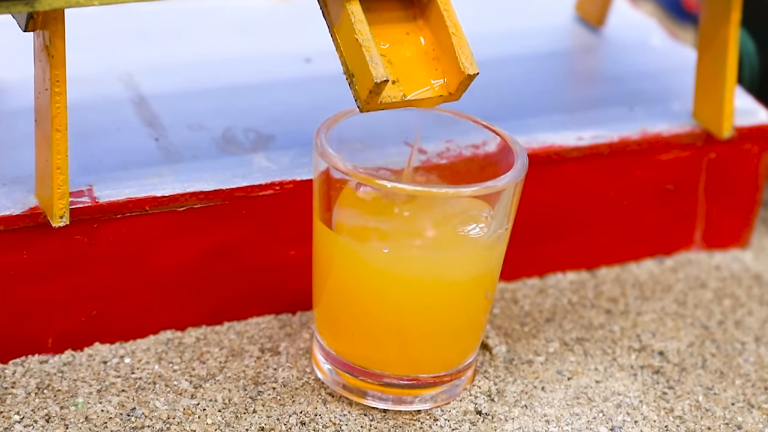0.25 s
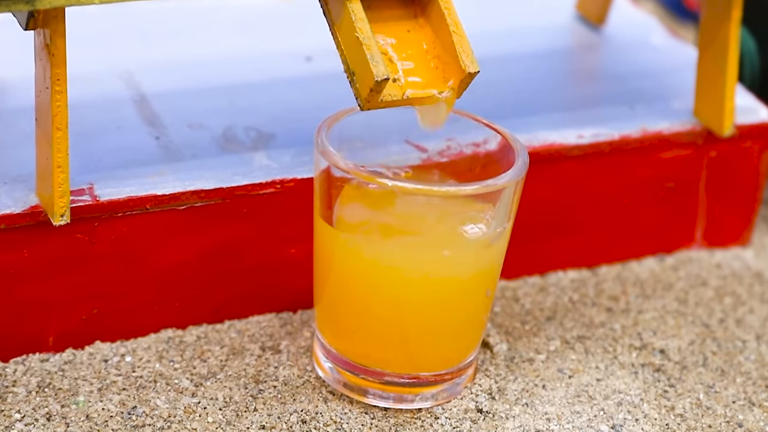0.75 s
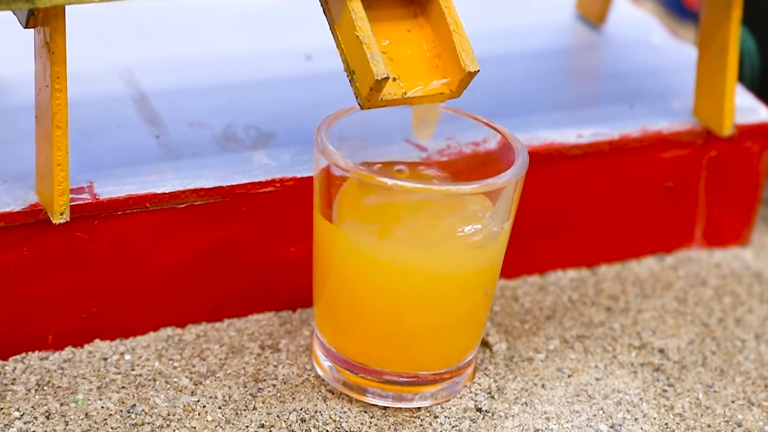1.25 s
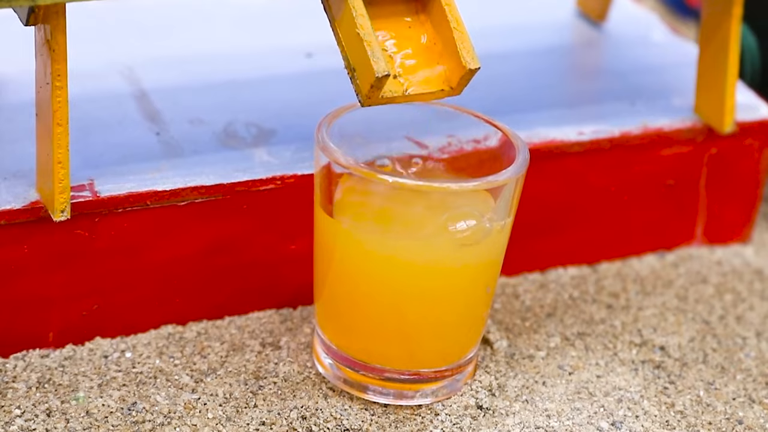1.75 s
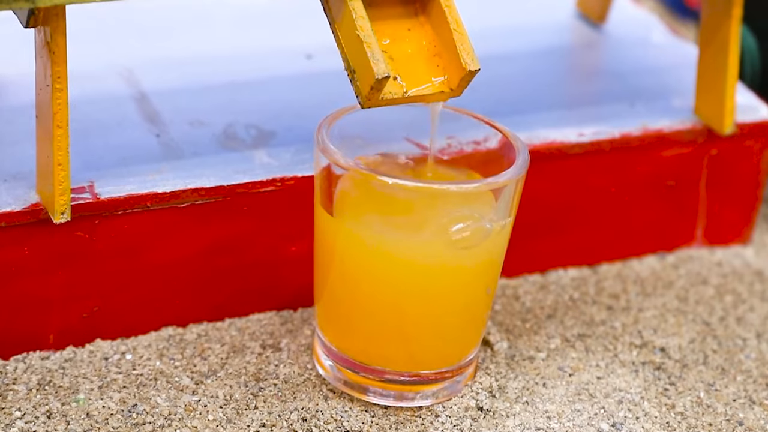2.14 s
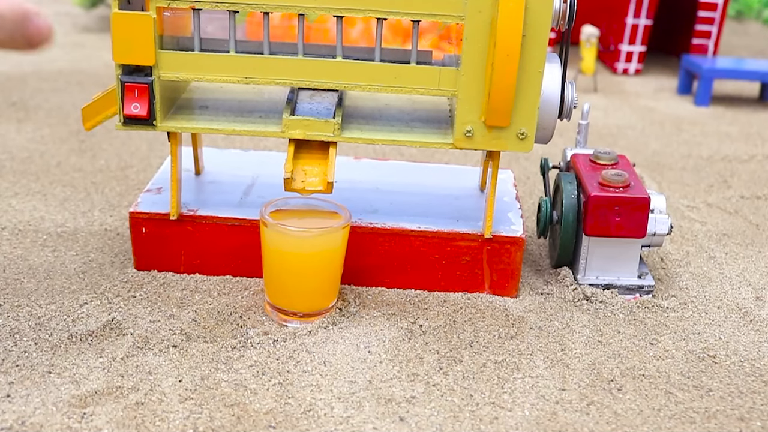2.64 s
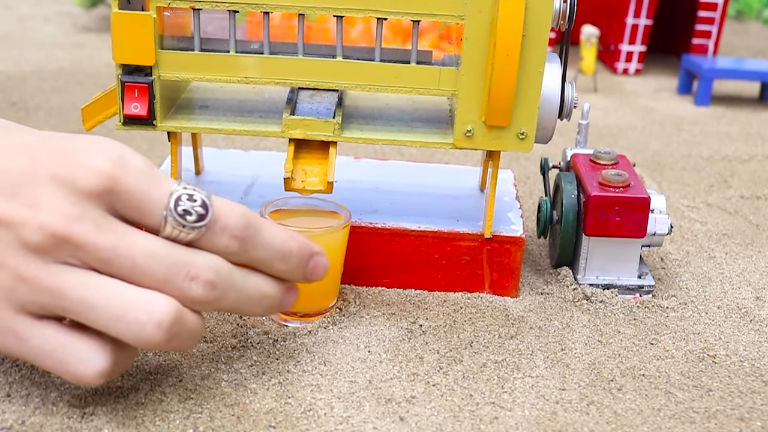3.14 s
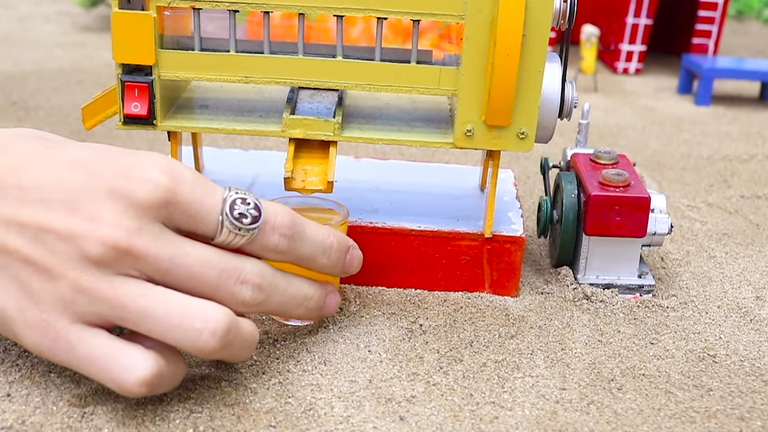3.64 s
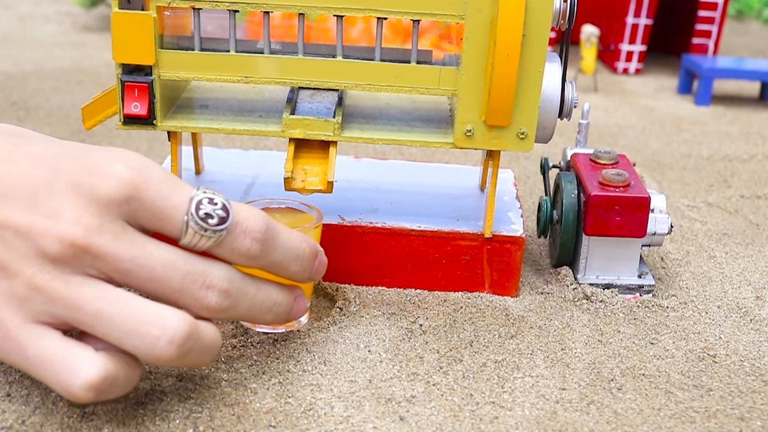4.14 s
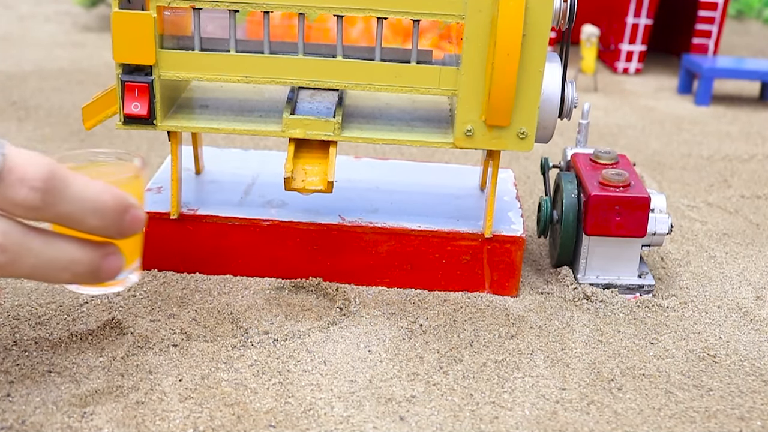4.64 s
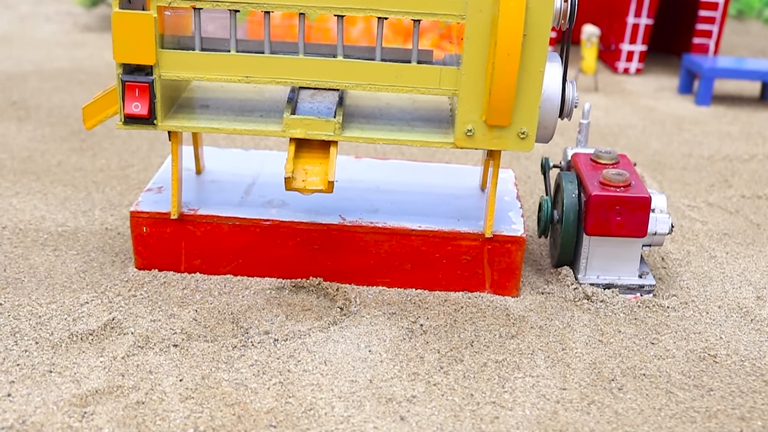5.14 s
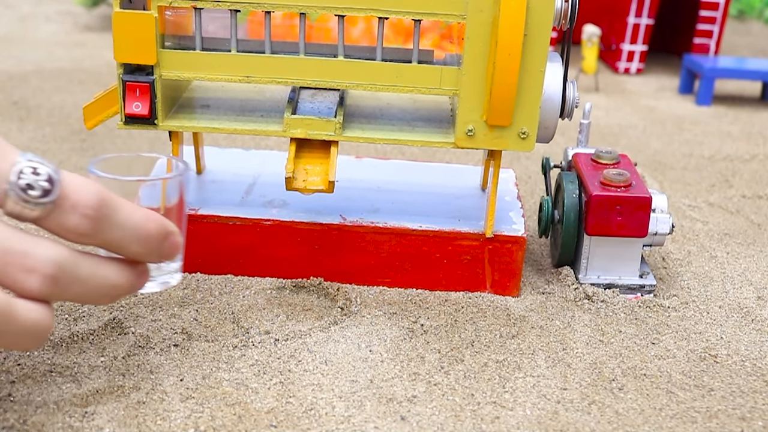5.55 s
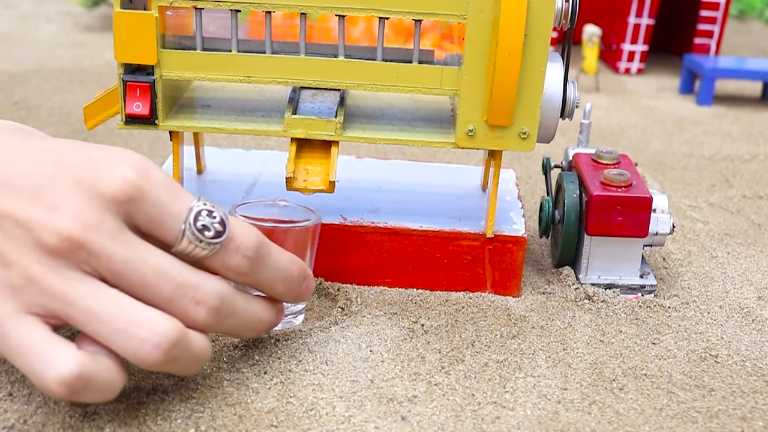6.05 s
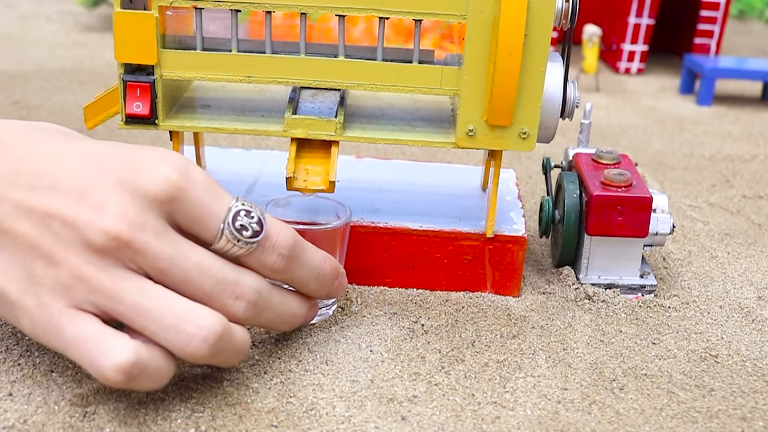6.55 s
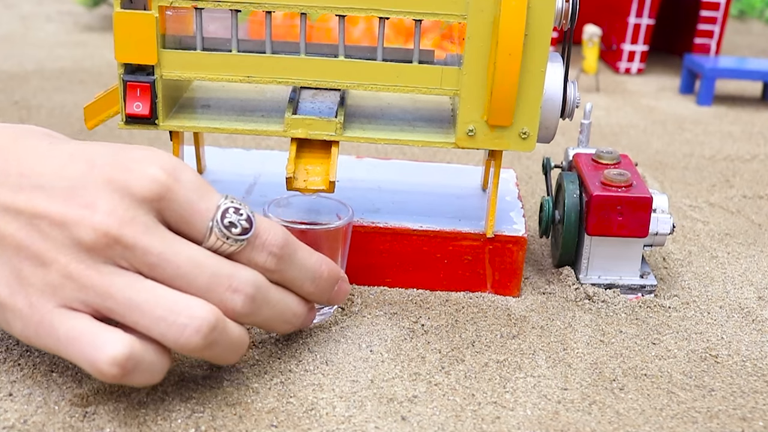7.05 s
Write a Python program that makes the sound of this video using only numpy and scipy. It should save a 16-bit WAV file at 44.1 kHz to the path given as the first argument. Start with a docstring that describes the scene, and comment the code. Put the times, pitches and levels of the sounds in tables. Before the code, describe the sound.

Whining toy press and wet juice patter die away, leaving garden birdsong over faint traffic, one hard glass knock and scrape, later a second clunk.

```python
"""Toy juice press in a garden

A small motor hums, whines and rattles its gears, is switched off and runs down. Splats of juice and
clunks of the gears are noise bursts and short pitched pops, amid fine spray and small bubbles.
Birds sing as gliding tones with a dense echo tail over a far traffic rumble of filtered noise. A full
glass is scraped up from the stand and an empty one knocked down in its place: knocks and rubbing grit
excite the decaying modes of stand and glass."""
import sys
import numpy as np
from scipy import signal
from scipy.fft import rfft, irfft
from scipy.io import wavfile
from scipy.ndimage import uniform_filter1d

SR = 44100
rng = np.random.default_rng(int(sys.argv[2]) if len(sys.argv) > 2 else 0)


def convert_level_to_amplitude(level_db):
    """Map a level in decibels to its linear amplitude factor."""
    exponent = np.asarray(level_db, float) / 20
    return 10 ** exponent


def to_wav(s):
    """Save 16-bit WAV."""
    ch = np.atleast_2d(s).T  # columns
    pcm = np.round(np.clip(ch, -1, 1) * 32767)  # PCM
    wavfile.write(sys.argv[1], SR, pcm.astype(np.int16))


N = 321930  # samples


def evened(x):
    """Power normalisation: scales to an rms of 1."""
    return x / np.sqrt(np.mean(x ** 2) + 1e-20)


def read(points, hz):
    """Interpolation on a logarithmic frequency axis of a table of (Hz, value)."""
    f, value = np.transpose(points)
    return np.interp(np.log(hz + 1), np.log(f + 1), value)


def add(mix, s, sound):
    """Superposition: adds sound to the mix from s seconds on."""
    part = mix[round(s * SR):][:len(sound)]
    part += sound[:len(part)]


def columns(rows):
    """Linear interpolation: start time, then each column of a curve at the sample rate."""
    s, *rest = np.transpose(rows)
    t = np.arange(s[0], s[-1], 1 / SR)
    return s[0], *(np.interp(t, s, c) for c in rest)


def coloured(x, spectrum):
    """Minimum-phase filtering: the log gain fixes the phase, so the response is causal; unit energy."""
    gain_db = read(spectrum, abs(np.fft.fftfreq(4096, 1 / SR)))
    log_gain = np.log(convert_level_to_amplitude(np.maximum(gain_db, -100)))
    taps = np.fft.ifft(np.exp(np.conj(signal.hilbert(log_gain)))).real[:2048]
    return signal.oaconvolve(x, taps / np.linalg.norm(taps))[:len(x)]


def resonate(x, hz, width):
    """Resonance by heterodyning: shift hz (a number or curve) to zero, low-pass, and shift back."""
    turn = np.exp(2j * np.pi * np.cumsum(hz * np.ones(len(x))) / SR)
    r = np.exp(-np.pi * width / SR)
    return 2 * (turn * signal.lfilter([1 - r], [1, -r], x / turn)).real


def ring(modes):
    """Modal superposition: a struck object answers with exponentially decaying sines."""
    t = np.arange(SR // 2) / SR
    return sum(convert_level_to_amplitude(db - 60 * t / t60) * np.sin(2 * np.pi * hz * t) for hz, db, t60 in modes)


def grit(count, per_s, spread_db):
    """Random impulse process: clicks of either sign, a few of them large, at an rms of 1."""
    draw = rng.random((count, 3))
    size = convert_level_to_amplitude(-spread_db * np.log(draw[:, 0] + 0.0041)) * np.sign(draw[:, 1] - .5)
    return evened(size * (draw[:, 2] < per_s / SR))


def glide(length, first, last):
    """Linear glide over length seconds."""
    return np.linspace(first, last, num=round(length * SR))


def whistle(hz, db, rough):
    """Frequency modulation: a slightly hoarse tone follows the pitch curve, with a faint octave."""
    rounded_hz = uniform_filter1d(hz, 150, mode="nearest")  # rounds the corners of the glide
    phase = 2 * np.pi * np.cumsum(rounded_hz) / SR
    hoarse = 1 + rough * evened(uniform_filter1d(rng.standard_normal(len(hz)), 60))
    tone = np.sin(phase) + convert_level_to_amplitude(-48.0) * np.sin(2 * phase)
    return np.sqrt(2) * convert_level_to_amplitude(db) * hoarse * tone * signal.windows.tukey(len(hz), .18)


# Spectrum of the background. Each row: frequency in Hz, relative level in dB per Hz.
AIR = [(12, -33), (20, -6), (81, -4), (337, -18), (422, -25), (897, -27.5), (1440, -34), (1610, -36.5),
       (1910, -38.5), (3530, -40), (5380, -54.5), (7520, -51.5), (8180, -50.5), (9670, -78.5),
       (16000, -80.5)]
# Likeness of left and right. Each row: frequency in Hz, correlation from -1 to 1.
SAME = [(25, 0.96), (60, 1), (130, 0.95), (290, 0.82), (640, 0.34), (1410, -0.5), (3100, -0.83),
        (6820, -0.36), (15000, 0.08)]
# Hump of far engines. The row: frequency in Hz, width in Hz, boost in dB.
RUMBLE = (59.5, 10.2, 9.36)
AIR_DB = -40.5  # rms level


def air():
    """Partially coherent noise fields: far traffic rumble and the hush of the garden."""
    frames, hz = N // 512 + 5, np.fft.rfftfreq(2048, 1 / SR)
    a, b, c, d, patches = np.moveaxis(rng.standard_normal((frames, 1025, 5)), (2, 1), (0, 1))
    patches = evened(uniform_filter1d(uniform_filter1d(patches, 20, 0), 12, 1))
    same = np.clip(read(SAME, hz), -1, 1)[:, None]
    left = a + 1j * b
    right = same * left + np.sqrt(1 - same ** 2) * (c + 1j * d)
    hump_hz, width, hump_db = RUMBLE
    colour_db = read(AIR, hz) + hump_db * np.exp(-((hz - hump_hz) / width) ** 2)
    z = np.array([left, right]) * convert_level_to_amplitude(colour_db[:, None] + 1.2 * patches)
    return convert_level_to_amplitude(AIR_DB) * evened(signal.istft(z, nperseg=2048, noverlap=1536)[1][:, :N])


# Reverberation of the garden. Each row: frequency in Hz, time to decay by 60 dB in seconds.
GARDEN_T60 = [(1000, 1.1), (4000, 1.15), (9000, 1.04)]


def garden(x):
    """Diffuse reverberation: strong early echoes, then scatter, dying at much the same rate at all pitches."""
    t = np.arange(2 * SR) / SR
    taps = rng.standard_normal((3, 2 * SR)) * (t > .004) * (1 + 4.2 * np.exp(-t / 0.012))
    sides = taps[0] + 1.7 * taps[1:]  # a shared part and one of each side's own
    hz, t, z = signal.stft(sides, SR, nperseg=256)
    decay = convert_level_to_amplitude(-60 * t / read(GARDEN_T60, hz)[:, None])
    tail = signal.istft(z * decay, SR, nperseg=256)[1]
    return signal.fftconvolve(x[None], tail / np.linalg.norm(tail[0]), axes=1)[:, :N]


# Warbling phrases, and a faint low tone, perhaps the glass ringing.
# Each row: level in dB, pitch curve as pairs of time in seconds and frequency in Hz.
WARBLES = [(-52.5, [(2.095, 3640), (2.14, 2900), (2.17, 3080), (2.2, 3450), (2.22, 3230)]),
           (-49.5, [(1.155, 2960), (1.18, 2670), (1.22, 2580)]), (-49, [(1.235, 2950), (1.26, 3320),
           (1.275, 3350)]), (-47, [(1.475, 2960), (1.5, 2670), (1.54, 2570)]), (-48, [(1.555, 2940),
           (1.58, 3300), (1.595, 3350)]), (-47, [(1.795, 2930), (1.82, 2670), (1.86, 2590)]),
           (-47.5, [(1.875, 2980), (1.9, 3300), (1.915, 3370)]), (-49, [(2.015, 4290), (2.03, 3730),
           (2.045, 3620)]), (-52, [(2.255, 4050), (2.28, 4820)]), (-54.5, [(2.2, 2850), (2.225, 3300),
           (2.24, 3300)]), (-54, [(2.54, 2900), (2.565, 3310)]), (-54.5, [(2.275, 3540), (2.295, 3690)]),
           (-50, [(2.12, 2980), (2.14, 2700), (2.17, 2580)]), (-47, [(2.385, 4150), (2.4, 3750),
           (2.46, 3200), (2.53, 4020)]), (-50, [(2.455, 2780), (2.48, 2617), (2.52, 2583)]),
           (-49, [(2.705, 3150), (2.755, 3117), (2.795, 3200), (2.805, 2950)]), (-47.5, [(2.795, 2910),
           (2.812, 2550), (2.83, 2690)]), (-48.5, [(2.9, 3000), (2.93, 3100), (2.95, 3540), (2.97, 3260),
           (2.99, 3190)]), (-50, [(3.03, 3380), (3.07, 2700)]), (-52, [(3.13, 2560), (3.142, 2700),
           (3.155, 2770)]), (-53, [(3.18, 2750), (3.19, 3096), (3.2, 2780), (3.21, 3220), (3.22, 2910),
           (3.24, 2990)]), (-48.5, [(3.28, 3500), (3.29, 3245), (3.32, 3225), (3.34, 2850), (3.37, 3550),
           (3.39, 3300)]), (-51, [(3.43, 4620), (3.445, 5600), (3.46, 4320), (3.49, 3600)]),
           (-53, [(3.55, 2734), (3.575, 3000), (3.6, 2730), (3.62, 3130), (3.64, 2720), (3.66, 3150),
           (3.675, 3000)]), (-54, [(3.835, 3220), (3.85, 3860), (3.86, 3000), (3.875, 3810)]),
           (-50, [(3.87, 4330), (3.91, 5050), (3.92, 6030), (3.96, 6230)]), (-47.5, [(4.72, 4200),
           (4.75, 4380), (4.78, 5000), (4.81, 5440), (4.84, 7150), (4.88, 7900)]), (-60.5, [(3.752, 5400),
           (3.767, 7400)]), (-47.5, [(5.705, 3975), (5.725, 3875), (5.745, 3680)]), (-64, [(6.24, 3420),
           (6.35, 3220)]), (-66, [(6.25, 4180), (6.33, 4060)]), (-67, [(6.35, 2950), (6.385, 2580)]),
           (-64, [(6.635, 3090), (6.67, 3190)]), (-65, [(6.58, 1390), (6.7, 1430), (6.9, 1400)]),
           (-48.5, [(2.58, 5860), (2.595, 4300), (2.62, 4100), (2.655, 4330)]), (-51, [(2.298, 6000),
           (2.312, 4700), (2.325, 3320)]), (-58.5, [(3.42, 3150), (3.45, 2906), (3.53, 2920)]),
           (-65.5, [(6.59, 3480), (6.64, 2950), (6.7, 2780)]), (-52.5, [(7.16, 2740), (7.185, 2530),
           (7.21, 2660)]), (-54.5, [(7.24, 2740), (7.27, 3300), (7.29, 3100)])]
# Nearly level whistles, short or with a fading echo.
# Each row: start in seconds, length in seconds, frequency in Hz, level in dB.
LEVEL_WHISTLES = [(1.977, 0.25, 3990, -53.5), (1.125, 0.022, 2480, -47), (1.445, .025, 2480, -44),
                  (1.765, 0.024, 2480, -41), (2.66, 0.15, 4080, -56), (2.089, 0.031, 2460, -49),
                  (2.389, 0.057, 2820, -49), (2.416, 0.053, 2450, -48.5), (2.424, 0.2, 3870, -49.5),
                  (2.759, .025, 2450, -49), (2.81, 0.4, 3854, -52), (3.673, 0.024, 4345, -36),
                  (3.76, 0.076, 7540, -54.5), (3.987, 0.07, 4290, -38), (4.308, 0.021, 4330, -35),
                  (4.568, 0.233, 3864, -48.5), (4.572, 0.28, 4180, -51.5), (5.05, 0.27, 5210, -50.5),
                  (5.05, 0.21, 5500, -55), (5.342, 0.15, 7240, -54.5), (6.7, .15, 7350, -68),
                  (2.66, 0.14, 4300, -61), (2.6, 0.21, 2266, -60)]
# Trill of falling sweeps. Each row: start in seconds, length in seconds, first frequency in Hz, level in dB.
FALLS = [(4.08, 0.026, 6860, -46), (4.209, .07, 7730, -46.5), (4.345, 0.049, 7360, -42.5),
         (4.443, 0.053, 7450, -43), (4.541, 0.048, 7500, -42.5), (4.647, 0.058, 7160, -42.5)]
# Sharp downward chips. Each row: start in seconds, first frequency in Hz, level in dB.
CHIPS = [(3.421, 7320, -56), (5.417, 5740, -56)]
# Low falling chups. Each row: start in seconds, level in dB.
CHUPS = [(1.285, -52.5), (1.605, -58), (1.935, -58.5), (2.255, -53), (2.58, -52), (2.94, -54.5)]
# Faint rising tweets. Each row: start in seconds, level in dB.
TWEETS = [(5.721, -60), (5.855, -62), (5.99, -61.5), (6.205, -67.5), (6.335, -66), (6.646, -59.5),
          (6.81, -63.5)]
# for the level whistles; wander (rms) and sag are shares of the pitch
WHISTLE_FADE_DB, WHISTLE_WANDER, WHISTLE_SAG = -18, 0.0033, .015
FALL_HZ_PER_S, FALL_SLOW_HZ_PER_S, TRILL_S = 58000, 27000, 4.3  # slow until TRILL_S
CHIP_S, CHIP_DROP, CHIP_FALL_S = 0.028, 0.31, 0.0074  # drop as a share of the pitch
CHUP_S, CHUP_FIRST_HZ, CHUP_LAST_HZ = 0.03, 2290, 1820
TWEET_S, TWEET_FIRST_HZ, TWEET_LAST_HZ = .017, 3850, 6250


def notes():
    """Pitch contours: start, frequency curve and level of the near birds' tones and the faint low tone."""
    out = [(*columns(pitch), db) for db, pitch in WARBLES]
    for s, length, hz, db in LEVEL_WHISTLES:
        wander = evened(uniform_filter1d(rng.standard_normal(round(length * SR)), 500))
        settled = 1 - np.exp(-glide(length, 0, length) / .03)  # the pitch sags from the start on
        pitch = hz * (1 + WHISTLE_WANDER * wander - WHISTLE_SAG * settled)
        out.append((s, pitch, db + glide(length, 0, WHISTLE_FADE_DB)))
    for s, length, hz, db in FALLS:
        rate = FALL_HZ_PER_S if s > TRILL_S else FALL_SLOW_HZ_PER_S
        onset_db = -9 * np.exp(-glide(length, 0, length) / 0.0053)
        out.append((s, glide(length, hz, hz - rate * length), db + onset_db))
    drop = 1 - CHIP_DROP * (1 - np.exp(-glide(CHIP_S, 0, CHIP_S) / CHIP_FALL_S))
    out += [(s, hz * drop, db) for s, hz, db in CHIPS]
    out += [(s, glide(CHUP_S, CHUP_FIRST_HZ, CHUP_LAST_HZ), db) for s, db in CHUPS]
    return out + [(s, glide(TWEET_S, TWEET_FIRST_HZ, TWEET_LAST_HZ), db) for s, db in TWEETS]


CHATTER_DB, CHATTER_NOTES, CHATTER_ENDS_S = -74.5, 1533, 6.95  # loudest note, count, last start


def chatter():
    """Random superposition: many short gliding notes of far small birds."""
    far = np.zeros(N)
    for when, pitch, bend, length, size in rng.random((CHATTER_NOTES, 5)):
        count = round((0.019 + 0.055 * length) * SR)
        hz = (2500 + 3600 * pitch ** 1.5) * np.geomspace(1, .7 + 0.35 * bend, num=count)
        add(far, when * CHATTER_ENDS_S, whistle(hz, CHATTER_DB - 8 * size, 1.03))
    return far


# Buzzy notes. Each row: start in seconds, length in seconds, frequency in Hz, width in Hz, level in dB.
BUZZES = [(4.191, 0.041, 8100, 700, -55), (4.774, 0.053, 4620, 610, -47), (4.86, 0.028, 7870, 603, -66.5),
          (5.486, 0.18, 8000, 700, -62), (6.666, 0.047, 7730, 1383, -59.5)]
# Side of the singer. Each row: valid until in seconds, lead of the left side in samples.
BIRD_SIDES = [(5., 15), (5.4, -6), (6.9, -17), (7.4, 22)]
GARDEN_DB = -1.2  # reverberation of the near birds against their direct sound


def birds():
    """Interaural time difference places near notes and buzzes; far birds reach us as echoes only."""
    near = np.zeros(N)
    for s, hz, db in notes():
        add(near, s, whistle(hz, db, 0.14))
    for s, length, hz, width, db in BUZZES:
        hiss = resonate(resonate(rng.standard_normal(round(length * SR)), hz, width), hz, width)
        add(near, s, convert_level_to_amplitude(db) * evened(hiss) * signal.windows.tukey(len(hiss), .5))
    until, lead = np.transpose(BIRD_SIDES)
    at = np.arange(N)
    half = lead[np.searchsorted(until * SR, at)] / 2
    sides = np.array([np.interp(at + half, at, near), np.interp(at - half, at, near)])
    return sides + garden(convert_level_to_amplitude(GARDEN_DB) * near + chatter())


# Knocks. Each row: time in seconds, level in dB, loudest tone in Hz, its rise in seconds,
# drive of the glass in dB.
KNOCKS = [(4.0787, -26, 1230, 0.00058, -42), (4.086, -26, 1500, 0.0013, -50),
          (4.091, -24.5, 350, .003, -48), (4.103, -29, 1110, 0.0015, -38), (4.111, -21.5, 484, .002, -40),
          (4.122, -9.5, 470, 0.002, -36), (4.129, -11, 620, 0.002, -36), (4.134, -13.5, 582, .002, -32),
          (4.141, 1, 552, 0.0037, -22), (4.132, -9, 1640, 0.002, -29.5), (4.145, -18, 2560, .002, -33),
          (4.155, -16, 2670, 0.0012, -15), (4.156, -22, 4500, 0.001, -35), (6.444, -4.5, 915, 0.00071, -26),
          (6.4445, -26.5, 5040, .0005, -35.5), (6.4646, -13, 885, 0.0006, -26.5),
          (6.4637, -10, 1530, .0006, -29.5), (6.4688, -18, 4970, .0006, -13),
          (6.471, -17, 531, 0.00064, -33), (6.468, -10, 314, 0.0043, -11), (6.472, -7.5, 1440, 0.001, -32)]
KNOCK_CYCLES = 22  # a knock dies by 60 dB in so many cycles of its tone


def knocks(direct, force, rim):
    """Impact excitation: each knock sounds a short tone and sends a pulse into stand and glass."""
    t = np.arange(SR // 2) / SR
    for s, db, hz, rise, glass_db in KNOCKS:
        tone = ring([(hz, db, KNOCK_CYCLES / hz)])
        add(direct, s, tone * (1 - np.exp(-(t / rise) ** 2)))
        add(force, s, convert_level_to_amplitude(db - 38.0) * np.hanning(9))
        add(rim, s, convert_level_to_amplitude(glass_db) * np.array([.25, .5, .25]))


# A glass bottom rubs the stand as it lifts. Each row: time in seconds, rubbing force in dB.
LIFT = [(4.048, -64), (4.052, -48), (4.075, -49), (4.085, -37), (4.098, -44), (4.115, -32.5), (4.135, -30),
        (4.158, -25), (4.17, -50), (4.185, -48)]
# A glass bottom rubs the stand as it settles. Each row: time in seconds, rubbing force in dB.
SETTLE = [(6.4636, -42.5), (6.465, -14.5), (6.472, -16), (6.478, -23.5), (6.49, -29.5), (6.505, -49)]
# Sound of the grit itself. Each row: frequency in Hz, relative level in dB per Hz.
RUB = [(300, 1.5), (1500, 5.5), (2150, -2), (3000, -1), (5000, -8), (8000, -25), (9000, -58)]
# Its hiss under hard rubbing. Each row: frequency in Hz, relative level in dB per Hz.
RUB_TREBLE = [(5000, -30.5), (8000, 3.5), (13500, -6), (14500, -30)]


def rubbing(direct, force, rim):
    """Friction excitation: grit clicks are heard directly and drive stand and glass."""
    for stroke, per_s in ((LIFT, 1200), (SETTLE, 6000)):
        s, force_db = columns(stroke)
        rub = convert_level_to_amplitude(force_db) * grit(len(force_db), per_s, 2.2)
        add(force, s, convert_level_to_amplitude(-30.5) * rub)
        add(rim, s, convert_level_to_amplitude(-22) * rub)
        add(direct, s, convert_level_to_amplitude(-7.5) * coloured(rub, RUB))
        hiss_db = -20 + 1.5 * (force_db - force_db.max())  # only hard rubbing hisses
        add(direct, s, convert_level_to_amplitude(hiss_db) * coloured(rub, RUB_TREBLE))


# Modes of the full glass. Each row: frequency in Hz, relative level in dB, 60 dB decay time in seconds.
FULL_GLASS = [(1118, -7.5, 0.13), (2560, -6.5, 0.057), (2680, -5, 0.042), (1500, -0.5, 0.016),
              (3000, -14, 0.045), (4480, -8, 0.024), (4880, -19, 0.048), (7370, -14, 0.11),
              (10100, -16.5, 0.086), (11200, -31.5, 0.059), (12500, -23, 0.074), (12980, -28, 0.11)]
# Modes of the full glass clear of the stand. Each row: frequency in Hz, level in dB, 60 dB decay in seconds.
FREE_GLASS = [(1497, -33, 1.3), (2998, -36, .55), (5006, -50, .35)]
# Modes of the empty glass. Each row: frequency in Hz, relative level in dB, 60 dB decay time in seconds.
EMPTY_GLASS = [(1502, -12, 0.12), (1588, -4, 0.09), (2988, -18, 0.15), (3040, -21, 0.13), (5055, -9, 0.074),
               (6541, -30, .07), (7429, -16, 0.055), (7390, -23, 0.16), (9749, -35, .12), (10090, -32, .12),
               (11150, -38, .09), (12690, -32, .1)]
# Modes of the stand. Each row: frequency in Hz, relative level in dB, 60 dB decay time in seconds.
STAND = [(294, -27.5, 0.024), (552, 5.5, 0.059), (787, -1.5, 0.054), (926, -12.5, 0.032), (993, -7, 0.09),
         (1643, 2, 0.056), (2310, -14.5, 0.03), (2480, -1.5, 0.017), (2700, -15.5, 0.061),
         (2070, -10, 0.046), (3870, -8.5, 0.027), (4600, -15.5, .025)]
FREE_S, GRIP_S = 4.156, 4.385  # the full glass comes clear; fingers close on it and stop its ring


def glasses():
    """Modal response: knocks and grit drive the stand and whichever glass touches it."""
    direct, force, rim = np.zeros((3, N))
    knocks(direct, force, rim)
    rubbing(direct, force, rim)
    gripped = np.arange(N) > GRIP_S * SR
    full = signal.oaconvolve(rim * ~gripped, ring(FULL_GLASS))[:N]
    add(full, FREE_S, ring(FREE_GLASS))
    full *= uniform_filter1d(1. - gripped, 60)
    empty = signal.oaconvolve(rim * gripped, ring(EMPTY_GLASS))[:N]
    return direct + full + empty + signal.oaconvolve(force, ring(STAND))[:N]


def pop(hz, cycles, rise):
    """Damped oscillation, as of an air pocket in liquid: a brief decaying tone of rising pitch."""
    u = np.arange(round(4 * cycles / hz * SR)) / SR * hz / cycles  # time in units of the 1/e decay
    return (1 - np.exp(-u / 0.076)) * np.exp(-u) * np.sin(2 * np.pi * cycles * (u + rise * u ** 2))


# Flow of fine spray and small bubbles. Each row: time in seconds, relative level in dB.
TRICKLE = [(0.0, -42.5), (0.47, -45), (0.65, -41), (0.96, -47), (1.15, -47.5), (1.17, -57.5), (1.2, -44),
           (1.27, -39), (1.288, -62), (1.305, -46.5), (1.36, -46.5), (1.39, -49), (1.41, -51), (1.51, -46),
           (1.55, -45.5), (1.6, -51.5), (1.645, -52.5), (1.665, -54), (1.7, -45), (1.79, -50.5),
           (1.87, -49.5), (1.892, -64), (1.905, -41), (1.93, -57), (1.99, -65), (2.06, -74), (2.3, -87)]
# splat and bubble levels are against the trickle, mist against the splat; the spread only lowers them
SMALL_PER_S, SMALL_SPLAT_DB, SMALL_MIST_DB, SMALL_BUBBLE_DB, SMALL_SPREAD_DB = 12, 10, -9, 18.5, 7.5
SMALL_LOW_HZ, SMALL_HIGH_HZ = 600, 9000


def small_drips():
    """Random arrivals: rows of small drips, each with its bubble, whose size follows the trickle."""
    s, db = np.transpose(TRICKLE)
    when, size, pocket, pitch = rng.random((round(SMALL_PER_S * s[-1]), 4)).T
    when = when * s[-1]
    level_db = np.interp(when, s, db) - SMALL_SPREAD_DB * size
    drips = [(w, d + SMALL_SPLAT_DB, SMALL_MIST_DB) for w, d in zip(when, level_db)]
    hz = SMALL_LOW_HZ * (SMALL_HIGH_HZ / SMALL_LOW_HZ) ** pitch
    bubble_db = level_db + SMALL_BUBBLE_DB - SMALL_SPREAD_DB * pocket / 2
    return drips, list(zip(when, bubble_db, hz))


def spray_and_murmur(body, treble, pitched):
    """Clustered random impulses: fine spray ticks in clumps while small bubbles murmur."""
    s, level_db = columns(TRICKLE)
    count, t = len(level_db), np.arange(300) / SR
    level_db = level_db + 4.8 * evened(uniform_filter1d(rng.standard_normal(count), 700))
    puffs = rng.standard_normal((5, 300)) * np.exp(-((t - .003) / 0.0023) ** 2)
    for layer, db in ((body, 1.5), (treble, -3)):
        ticks = sum(signal.oaconvolve(grit(count, 85., 1.0), puff)[:count] for puff in puffs)
        clump_db = 1.7 * evened(uniform_filter1d(rng.standard_normal(count), 1200))  # each layer's own
        spray = 0.32 * rng.standard_normal(count) + evened(ticks)
        add(layer, s, convert_level_to_amplitude(level_db + db + clump_db) * spray)
    level_db = uniform_filter1d(level_db, 4000)  # the murmur goes on through lulls in the spray
    for hz in np.geomspace(450, 12000, num=20):
        murmur = signal.oaconvolve(grit(count, 15.0, 2.3), pop(hz, 3.2, 0.037))[:count]
        pitch_db = read(((450, 3), (2200, 3.0), (5000, -4.0), (12000, -26.5)), hz)
        add(pitched, s, convert_level_to_amplitude(level_db - 12.5 + pitch_db) * evened(murmur))


TINT_LOW_HZ, TINT_HIGH_HZ, TINT_Q, TINT = 1800, 7000, 5.8, 1.73  # each burst favours a band of its own


def noisy_bursts(bursts, body, treble):
    """Impact noise: each row gives a decaying burst with a band of its own and a mist of treble."""
    t = np.arange(900) / SR
    for (s, db, mist_db), noise in zip(bursts, rng.standard_normal((len(bursts), 900))):
        decay = np.exp(-t / 0.0027) + 0.3 * np.exp(-t / 0.01)
        burst = np.tanh(noise) * (1 - np.exp(-t / 0.00051)) * decay
        burst[30:33] += 1.5  # a sharp click just after the start
        tint_hz = TINT_LOW_HZ * (TINT_HIGH_HZ / TINT_LOW_HZ) ** (.5 + np.tanh(noise[-1]) / 2)
        tinted = resonate(burst, tint_hz, tint_hz / TINT_Q)
        add(body, s, convert_level_to_amplitude(db) * (0.26 * burst + TINT * tinted))
        mist_decay = np.exp(-t / 0.0014) + 0.076 * np.exp(-t / 0.0047)
        mist = noise[::-1] * (1 - np.exp(-(t / 0.00099) ** 2)) * mist_decay
        add(treble, s, convert_level_to_amplitude(db + mist_db) * mist)


CYCLES_AT_KHZ, CYCLES_SLOPE = 4.22, 0.33  # higher pops ring for more cycles
POP_RISE = 0.11  # largest factor of the squared term in a pop's phase


def pitched_pops(pops, body, pitched):
    """Damped resonance: each row gives a short fluttering tone that starts with a tick of noise."""
    t = np.arange(200) / SR
    for (s, db, hz), noise in zip(pops, rng.standard_normal((len(pops), 3000))):
        cycles = CYCLES_AT_KHZ * (hz / 1000) ** CYCLES_SLOPE
        tone = pop(hz, cycles, POP_RISE * min(abs(noise[0]), 2) / 2)
        flutter = 1 + 0.34 * evened(uniform_filter1d(noise, round(SR / hz)))[:len(tone)]
        add(pitched, s, convert_level_to_amplitude(db) * tone * flutter)
        add(body, s, convert_level_to_amplitude(db - 10.5) * noise[:200] * np.exp(-t / .0008))


# Noisy bursts: splats of juice and clunks of the gears.
# Each row: time in seconds, burst level in dB, mist against burst in dB.
BURSTS = [(.058, -19, -10), (.0925, -32, -10), (.1595, -20, 3), (.1915, -17, -4), (.226, -21, -14),
          (.247, -16.5, 3), (.2687, -17.5, -3), (.3122, -22.5, 7), (.4603, -22, 2), (.48, -29, -6),
          (.4994, -15.5, -2.5), (.5255, -13, -13), (.7025, -16, -18), (.7213, -21, -3), (.7453, -12.5, 3.5),
          (.7841, -30, -1), (.8185, -25, 4), (.859, -25, 7), (.9009, -30, 11), (.9098, -22.5, 0),
          (1.0062, -32, 11), (1.0218, -26.5, 10), (1.051, -42, 19), (1.065, -14.5, 8), (1.1054, -17.5, -3),
          (1.121, -45, 19), (1.1504, -31.5, 13), (1.1555, -38, 20.5), (1.1925, -30.5, 5),
          (1.2393, -28, -10), (1.2685, -31, -9), (1.3023, -38, -18), (1.3107, -21, 4), (1.3409, -26, 5),
          (1.4112, -23, -20), (1.4436, -28.5, -19), (1.5239, -26, -16), (1.5645, -22.5, 4.5),
          (1.595, -19, -9), (1.622, -9.5, -14), (1.6736, -37, 13), (1.66, -33, -10), (1.761, -39, -10),
          (2.038, -52, 5), (2.064, -46, -8), (1.703, -23, -13), (1.719, -23.5, -3), (1.729, -26, -17),
          (1.7612, -41, 17), (1.8203, -30, 11.5), (1.862, -30, 2), (1.9028, -19, 1.5), (1.936, -26, -3),
          (1.9813, -47, 5), (2.052, -39.5, 15.5), (2.0862, -48, 4), (1.42, -38, 11), (1.353, -34, -7),
          (1.488, -22.5, -4), (1.641, -27, 9.5), (1.683, -26, 6), (2.11, -52, 1), (2.19, -65, 3),
          (2.2408, -54, -8)]
# Short pitched pops of the juice and of the rattling gears.
# Each row: time in seconds, level in dB, frequency in Hz.
POPS = [(0.039, -14.5, 2640), (.105, -15, 715), (.1251, -26, 2100), (0.1338, -10, 1970),
        (0.163, -19.5, 2100), (.209, -18, 597), (0.227, -27, 1940), (0.292, -17, 2650), (.293, -13.5, 777),
        (.478, -20, 796), (0.4837, -20, 2170), (0.525, -17, 1295), (0.526, -20, 2340), (0.561, -11.5, 2480),
        (.5806, -15, 2100), (0.619, -17.5, 815), (0.6584, -12.5, 2100), (0.745, -25, 1506),
        (.764, -16, 790), (0.786, -8.5, 1850), (0.8191, -12.5, 1370), (0.8205, -12.5, 1980),
        (.871, -18, 750), (.958, -19, 736), (0.9666, -15, 1970), (0.9977, -16.5, 2020), (1.0397, -28, 2150),
        (1.064, -26, 380), (1.064, -35, 2200), (1.0871, -32, 2400), (1.1052, -18, 2100),
        (1.194, -14.5, 2140), (1.2137, -12, 2180), (1.238, -18, 1820), (1.25, -26.5, 720),
        (1.268, -17, 4000), (1.3073, -23, 2600), (1.315, -24.5, 756), (1.361, -24, 2430),
        (1.3897, -25, 1700), (1.4093, -13.5, 3410), (1.4528, -20, 2310), (1.487, -24.5, 1270),
        (1.492, -22, 1800), (1.5091, -18, 2240), (1.522, -18, 1720), (1.5635, -19, 1800),
        (1.571, -19.5, 1770), (1.595, -19, 628), (1.599, -23, 2400), (1.6217, -17, 1980),
        (1.639, -20, 2290), (1.66, -31.5, 393), (1.698, -20, 1900), (1.719, -23.5, 570),
        (1.7187, -20, 1860), (1.727, -21.5, 1490), (1.78, -28.5, 740), (1.7924, -23, 1540),
        (1.8, -24.5, 1530), (1.8223, -25, 1960), (1.8514, -27, 2120), (1.875, -33, 2670),
        (1.903, -36, 2780), (1.918, -19, 7000), (1.936, -29.5, 670), (1.9387, -20.5, 1794),
        (1.062, -24, 2280), (1.0653, -14.5, 4770), (1.121, -20, 10200), (1.136, -27, 3220),
        (1.15, -20, 7150), (1.1562, -23, 6640), (1.178, -29, 2660), (1.205, -23, 2010), (1.209, -19, 2100),
        (1.227, -22, 2060), (1.233, -25, 2800), (1.2377, -23, 3200), (1.2505, -38, 8060),
        (1.2674, -21, 2370), (1.311, -11.5, 6520), (1.3107, -20.5, 4600), (1.328, -32.5, 890),
        (1.343, -20, 4600), (1.354, -30, 7660), (1.406, -22, 1700), (1.444, -28, 7100), (1.446, -26, 5660),
        (1.5235, -22, 3030), (1.5795, -29, 2400), (1.6, -23.5, 3200), (1.644, -25, 4170),
        (1.681, -32, 1390), (1.716, -22, 2100), (1.735, -25, 5200), (1.761, -32, 860), (1.7746, -32, 2870),
        (1.806, -29, 1570), (1.823, -24, 6000), (1.84, -26, 5060), (1.902, -14.5, 6360), (1.971, -38, 2690),
        (2.051, -35, 2350), (1.742, -32, 1500), (1.8405, -34, 700), (1.917, -36, 710), (1.623, -32, 760),
        (1.5657, -29.5, 760), (1.149, -30.5, 600), (0.432, -15, 2400), (0.059, -18, 4000),
        (.075, -17, 2900), (.725, -16, 2000)]
# Colour of bursts, ticks and spray. Each row: frequency in Hz, relative level in dB per Hz.
BURST_COLOUR = [(600, -32.5), (1500, -3.5), (2250, 0), (3800, -7), (6500, -6.5), (8000, -9.5), (10000, -33)]
# Colour of mist and fine spray. Each row: frequency in Hz, relative level in dB per Hz.
MIST_COLOUR = [(5000, -16.5), (8000, 3), (11000, 0.5), (14500, -2), (15800, -9.5), (16500, -50.5)]


def juice_and_clunks():
    """Transient superposition: bursts and pops of juice and gears, amid fine spray and small bubbles."""
    body, treble, pitched = np.zeros((3, N))
    drips, bubbles = small_drips()
    noisy_bursts(BURSTS + drips, body, treble)
    pitched_pops(POPS + bubbles, body, pitched)
    spray_and_murmur(body, treble, pitched)
    return coloured(body, BURST_COLOUR) + coloured(treble, MIST_COLOUR) + pitched


# The gears catch. Each row: time in seconds, boost in dB.
CATCHES = [(.163, 7.1), (.295, 5.4), (.385, 2.6), (0.481, 4.3), (.62, 3.1), (0.745, 4.1), (.873, 1.9),
           (0.913, 6.3)]
CATCH_S = 0.0054


def catching(count):
    """Amplitude modulation: the gears rattle harder for a moment whenever they catch."""
    t = np.arange(count) / SR
    return convert_level_to_amplitude(sum(db * np.exp(-((t - s) / CATCH_S) ** 2) for s, db in CATCHES))


# Gear rattle. Each row: time in seconds, level in dB.
GRIND = [(0.0, -23), (0.47, -25), (0.654, -24.5), (0.788, -24.5), (1.002, -33.5), (1.102, -36), (1.2, -64)]
# Spectrum of the plastic housing. Each row: frequency in Hz, relative level in dB per Hz.
HOUSING = [(88, -41.5), (150, -13.5), (201, -11), (264, -14.5), (566, -8), (805, -4), (1170, -4),
           (1690, -5), (1900, -4.5), (4000, -6.5), (4580, -16.5), (14800, -33.5), (16000, -38.5)]
# Resonances of the housing. Each row: frequency in Hz, width in Hz, relative gain in dB.
HOUSING_MODES = [(790, 35, -7.5), (1700, 170, -3.5), (2100, 250, -10.5), (2580, 360, -7.5),
                 (3960, 120, -12)]


def gears():
    """Source and filter: random gear clicks sound through the resonances of the housing."""
    out = np.zeros(N)
    s, level_db = columns(GRIND)
    teeth = coloured(grit(len(level_db), 4000, 2.64), HOUSING) * catching(len(level_db))
    teeth = teeth + sum(3 * convert_level_to_amplitude(db) * resonate(teeth, hz, width) for hz, width, db in HOUSING_MODES)
    fade_out = np.minimum(np.arange(len(teeth))[::-1] / 2000, 1)
    add(out, s, convert_level_to_amplitude(level_db) * evened(teeth) * fade_out)
    return out


# Shaft speed under power. Each row: time in seconds, turns per second.
SPEED = [(0.0, 197), (0.18, 212), (0.36, 204), (0.47, 213), (0.58, 208), (0.65, 212), (0.74, 204)]
# Brief dips of the whine. Each row: time in seconds, change in dB.
DROPOUTS = [(0.07, -2), (0.368, -29), (0.608, -23)]
# switched off, the shaft loses turns steadily, crawls and stalls
OFF_S, SLOWING_PER_S, CRAWL_PER_S, STALL_S = .735, 1500, 61, .9
SEGMENTS = 8  # whine cycles per turn, one for each commutator segment
HUM_DB, HUM_WAVER_DB, OVERTONE_DB = -41, 2, -9  # the overtone is against the hum
FRAME_HZ, FRAME_WIDTH_HZ, FRAME_DB = 57, 19, 14.5  # the slowing shaft shakes the frame
FRAME_FADE_DB_PER_S = 298  # while the shaft crawls
WHINE_DB, WHINE_FADE_DB_PER_S, DROPOUT_S = -30.5, 597, 0.017  # the whine fades once switched off


def shaft():
    """Rotational harmonics: hum at one and two cycles a turn, and an unsteady commutator whine."""
    out, t = np.zeros(N), np.arange(0, STALL_S, 1 / SR)
    coast = np.maximum(t - OFF_S, 0)
    powered = np.interp(t, *np.transpose(SPEED))
    speed = np.maximum(powered - SLOWING_PER_S * coast, CRAWL_PER_S)
    crawled = np.cumsum(speed <= CRAWL_PER_S) / SR
    waver = evened(uniform_filter1d(uniform_filter1d(rng.standard_normal(len(t)), 1500), 1500))
    shake_db = FRAME_DB * np.exp(-((speed - FRAME_HZ) / FRAME_WIDTH_HZ) ** 2)
    hum_db = HUM_DB + HUM_WAVER_DB * waver + shake_db - FRAME_FADE_DB_PER_S * crawled
    dips_db = sum(db * np.exp(-((t - s) / DROPOUT_S) ** 2) for s, db in DROPOUTS)
    wobble = evened(uniform_filter1d(rng.standard_normal(len(t)), 400))
    whine_db = WHINE_DB - WHINE_FADE_DB_PER_S * coast + dips_db + 0.7 * wobble
    phase = 2 * np.pi * np.cumsum(speed * (1 + 0.0018 * wobble)) / SR
    hum = convert_level_to_amplitude(hum_db) * (np.sin(phase) + convert_level_to_amplitude(OVERTONE_DB) * np.sin(2 * phase))
    whine = convert_level_to_amplitude(whine_db) * np.sin(SEGMENTS * phase)
    fade_out = np.minimum(np.arange(len(t))[::-1] / 400, 1)
    add(out, 0, np.sqrt(2) * (hum + whine) * fade_out)
    return out


# Tones the gears sing while coasting. Each row: start in seconds, length in seconds, first frequency in Hz,
# last frequency in Hz, level in dB.
COASTING = [(.825, .045, 2030, 2070, -34), (.89, .05, 2040, 2090, -34), (.99, .05, 2040, 2080, -40),
            (.815, .055, 1100, 960, -33), (.95, .04, 1125, 960, -36)]


def motor():
    """Rotating machinery: tones locked to the shaft, gear rattle, and gliding tones as it coasts."""
    out = shaft() + gears()
    for s, length, first_hz, last_hz, db in COASTING:
        add(out, s, whistle(glide(length, first_hz, last_hz), db, 0.458))
    return out


ROTATIONS_PER_S = 9


def widened(x, side, decay_s):
    """Stereo widening: three short noise filters rotate to decorrelate left and right."""
    t, hz = np.arange(3000) / SR, np.fft.rfftfreq(3000, 1 / SR)
    spread = rfft(rng.standard_normal((3, 3000)) * np.exp(-t / decay_s), axis=1)
    spread *= convert_level_to_amplitude(read(side, hz)) / np.sqrt(uniform_filter1d(abs(spread) ** 2, 15, axis=1))
    filters = irfft(spread, axis=1) * (t < .05)
    turn = 2 * np.pi * (ROTATIONS_PER_S * np.arange(N) / SR + np.arange(3)[:, None] / 3)
    sent = x * np.sqrt(2 / 3) * np.cos(turn)
    other = signal.oaconvolve(sent, filters, axes=1)[:, :N].sum(axis=0)
    return np.array([x + other, x - other])  # opposite in sign left and right


# Stereo width of the glasses. Each row: frequency in Hz, side level against the middle in dB.
GLASS_SIDE = [(60, -4), (180, -5.5), (550, -15), (1650, -12), (4970, -11), (15000, -5)]
# Stereo width of juice and clunks. Each row: frequency in Hz, side level against the middle in dB.
JUICE_SIDE = [(300, -22), (3000, -24.5), (8000, -25), (15000, -19.5)]
# Stereo width of the motor. Each row: frequency in Hz, side level against the middle in dB.
MOTOR_SIDE = [(60, -10.5), (180, -4.5), (550, -3), (1650, -15.5), (4970, -14), (15000, -9)]


def scene():
    """Superposition of all sources, from the background to the press."""
    background = air() + birds()
    stand = widened(glasses(), GLASS_SIDE, 0.0046)
    splashes = widened(juice_and_clunks(), JUICE_SIDE, .003)
    press = widened(motor(), MOTOR_SIDE, 0.011)
    return background + stand + splashes + press


TOP_HZ = 16000


def top_cut(x):
    """Nothing passes above the cut-off."""
    return signal.sosfilt(signal.butter(12, 16660, fs=SR, output="sos"), x)


def record(dry):
    """Band limitation: a linear-phase low-pass removes what lies above TOP_HZ."""
    limited = signal.oaconvolve(dry, signal.firwin(255, TOP_HZ, fs=SR)[None], "same")
    return top_cut(limited)


dry = scene()
out = record(dry)
to_wav(out)
```